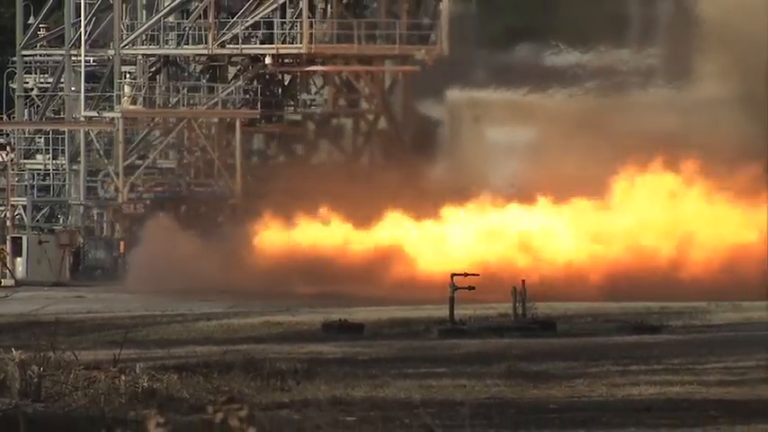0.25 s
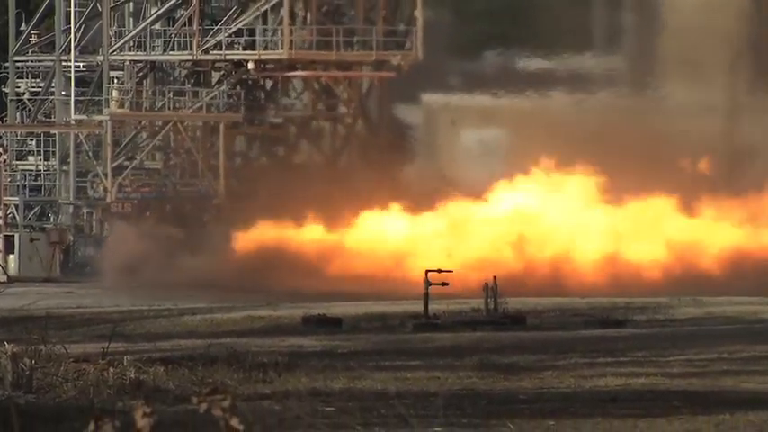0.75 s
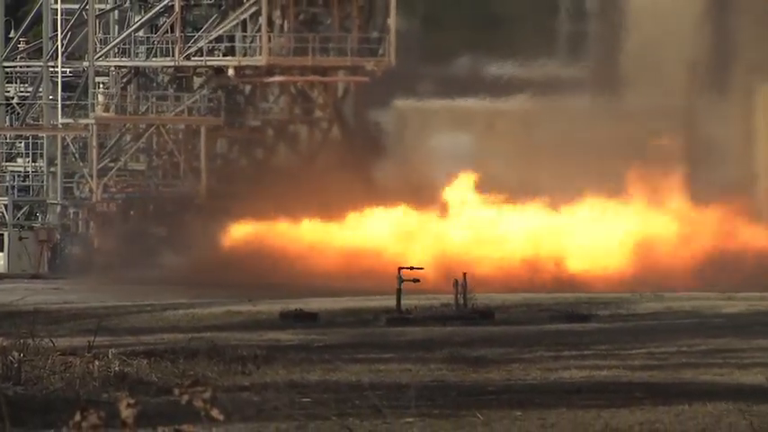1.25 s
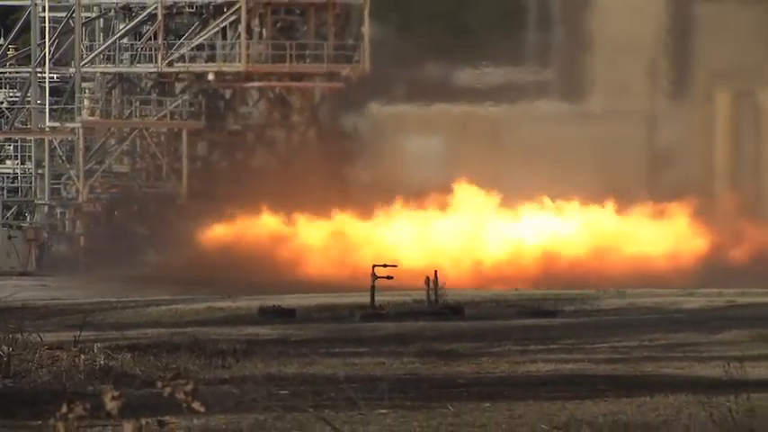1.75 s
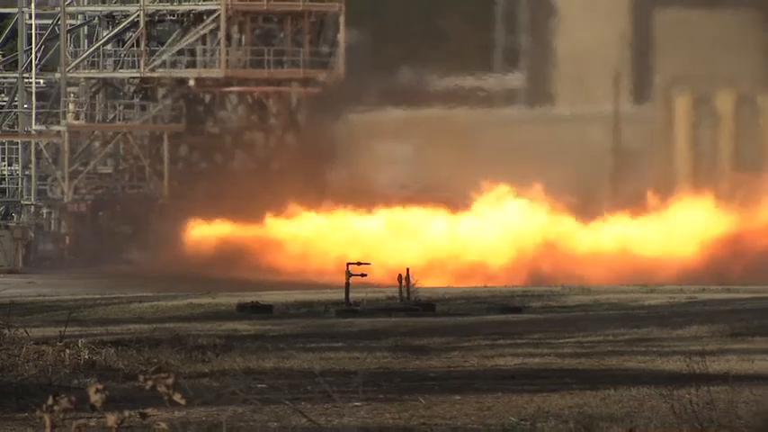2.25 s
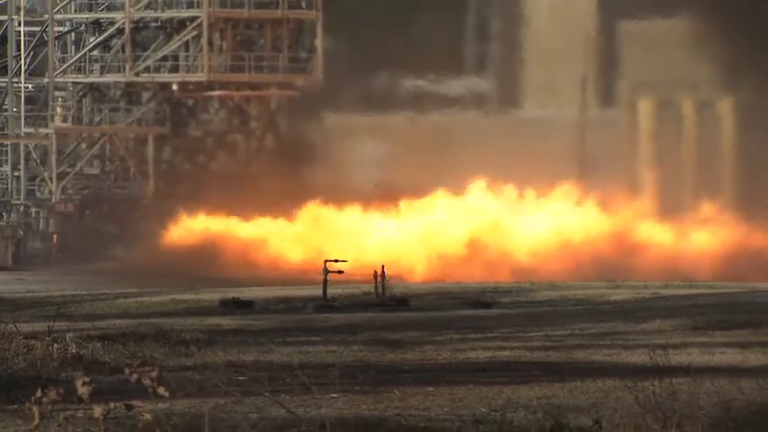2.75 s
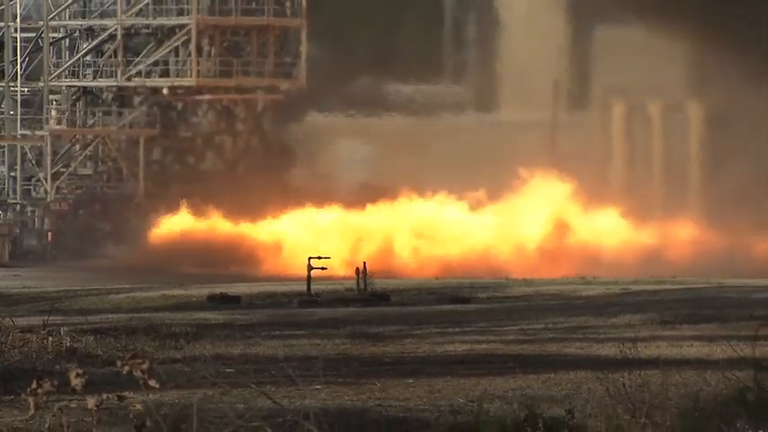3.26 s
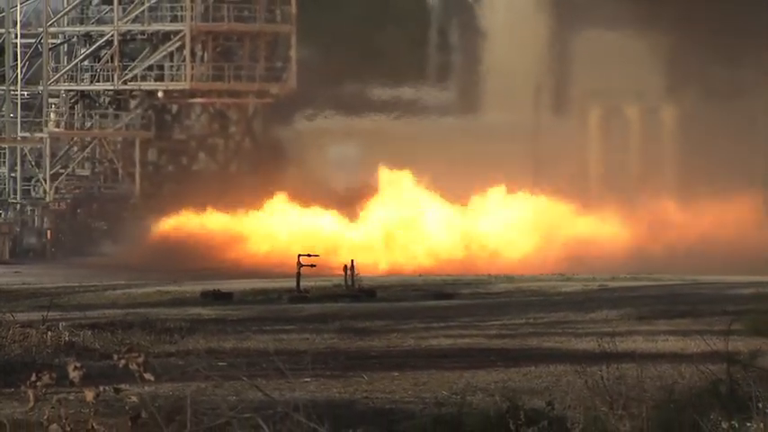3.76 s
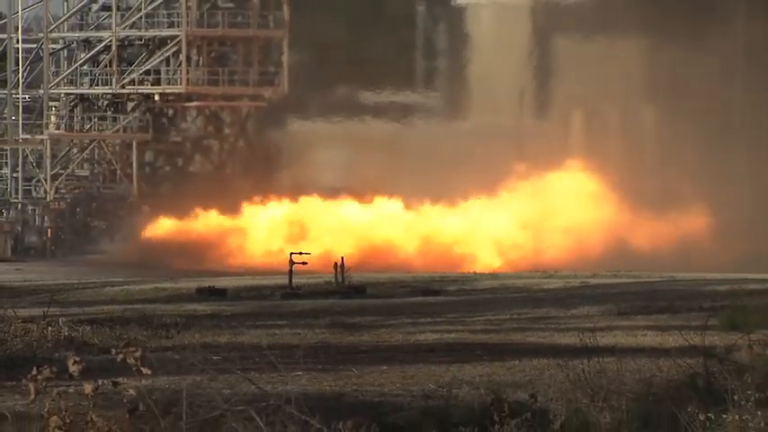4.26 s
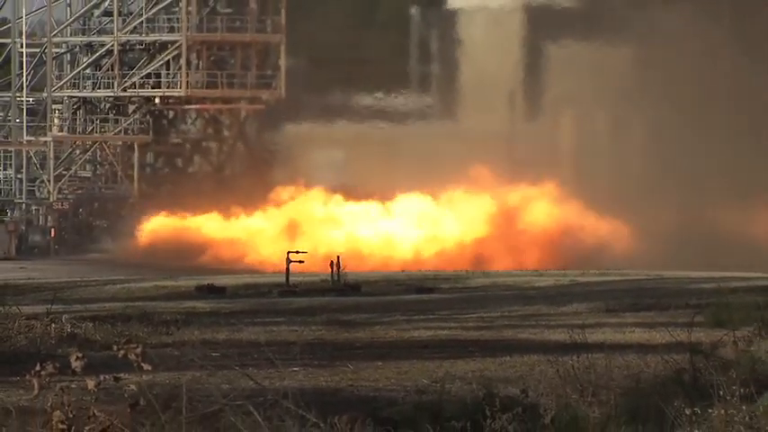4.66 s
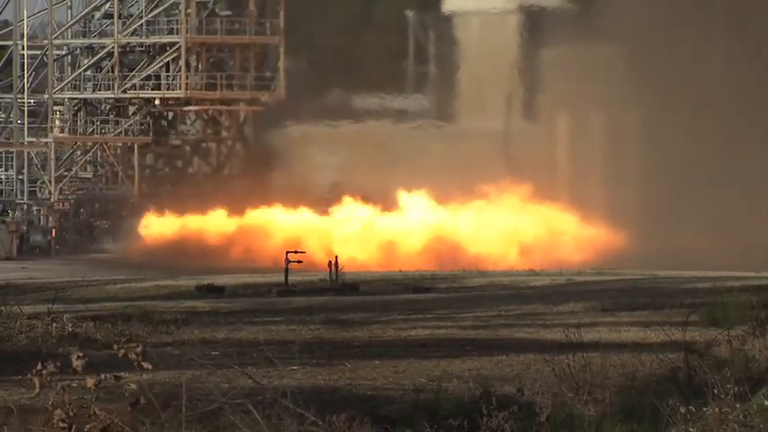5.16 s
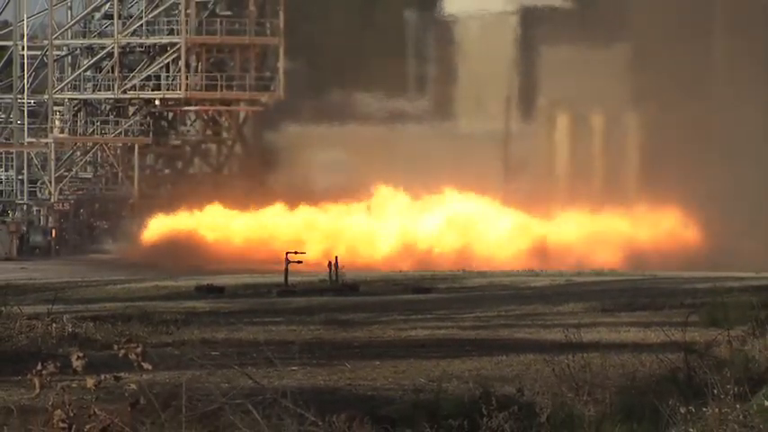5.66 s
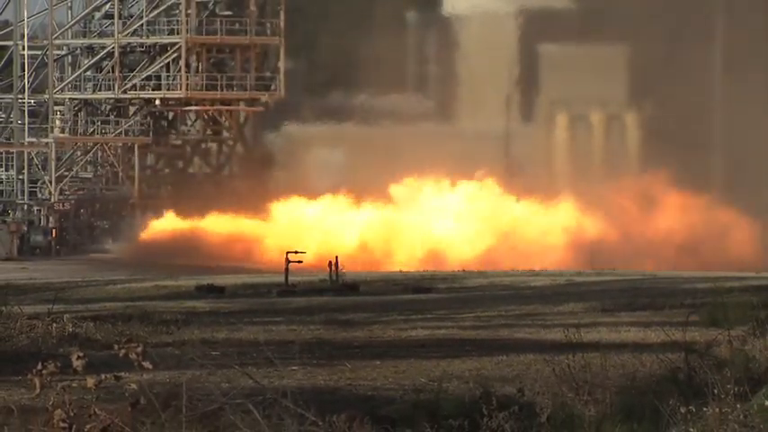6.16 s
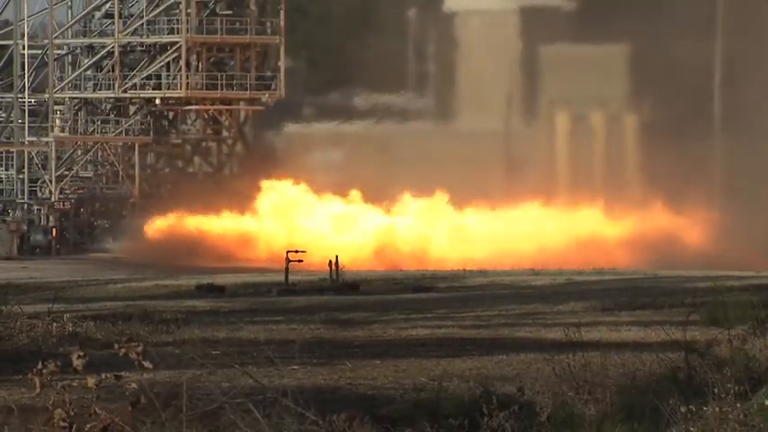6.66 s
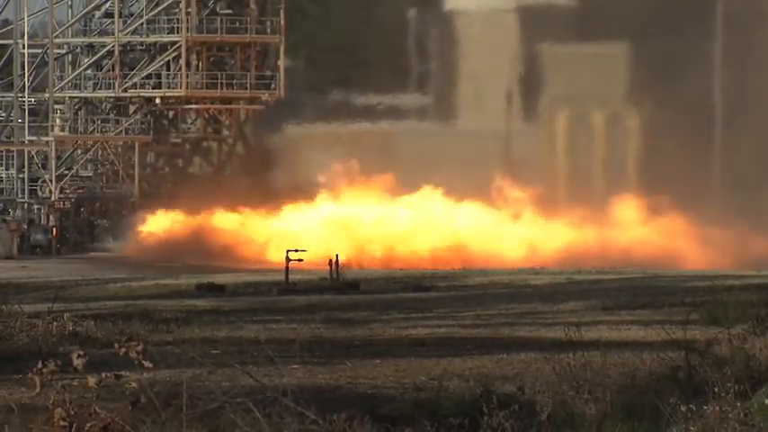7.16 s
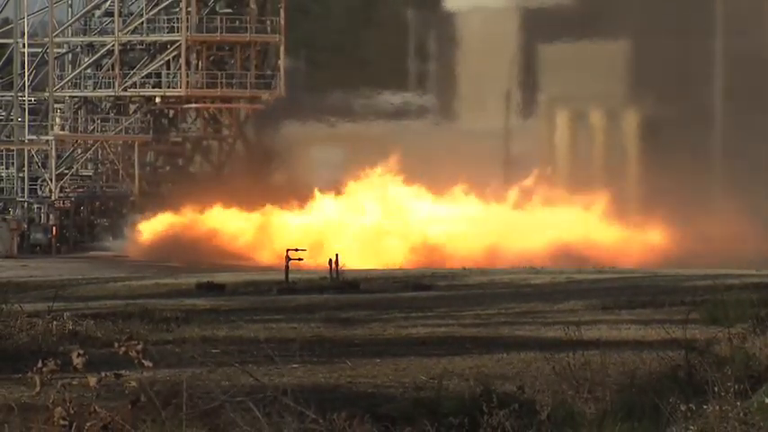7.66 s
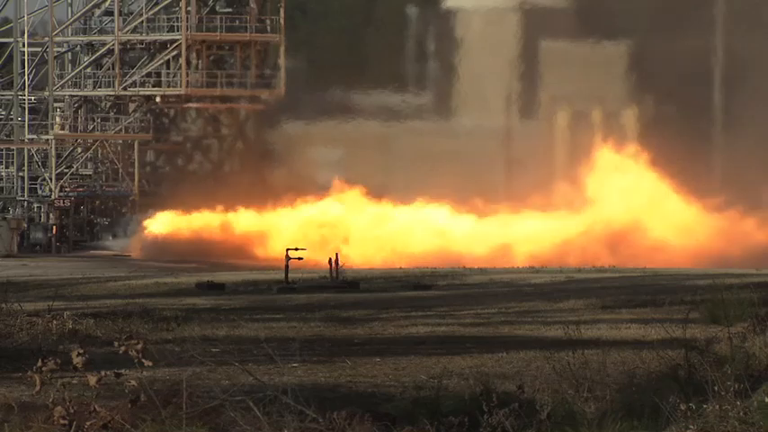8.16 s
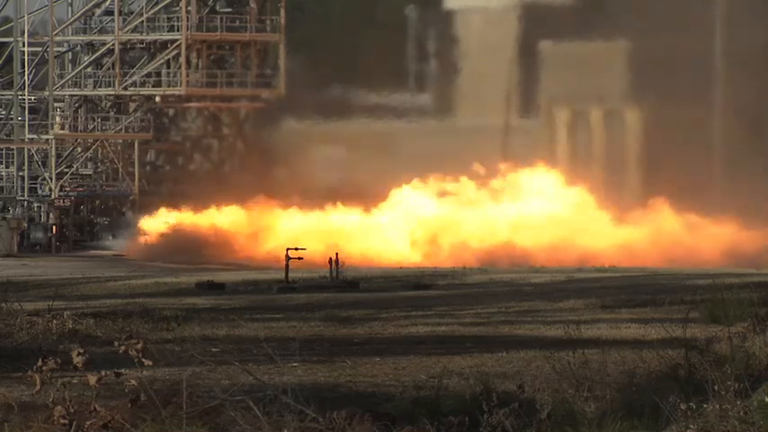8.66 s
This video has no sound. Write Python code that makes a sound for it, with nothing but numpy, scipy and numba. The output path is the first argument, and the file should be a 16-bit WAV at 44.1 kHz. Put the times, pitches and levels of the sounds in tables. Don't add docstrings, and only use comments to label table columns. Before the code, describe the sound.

Continuous rush of a distant rocket engine flame, low rumbling and roaring with a soft, slowly shifting hiss and flat, squeezed loudness.

```python
import sys
import numpy as np
from scipy import signal
from scipy.fft import rfft, irfft, next_fast_len
from scipy.io import wavfile
from scipy.ndimage import uniform_filter1d, map_coordinates
from numba import njit

SR = 44100
rng = np.random.default_rng(int(sys.argv[2]) if len(sys.argv) > 2 else 0)


def waveform_to_disk(signal):
    frames = np.transpose(np.atleast_2d(signal))
    scaled = np.clip(frames, -1, 1) * 32767
    samples = np.round(scaled).astype(np.int16)
    wavfile.write(sys.argv[1], SR, samples)


def gain_from_db(level_db):
    decades = np.asarray(level_db, float) / 20
    return 10 ** decades


N = 393372


def unit(x):
    return x / np.sqrt(np.mean(x ** 2) + 1e-20)


def wobble(rate_hz):
    knots = rng.standard_normal(int(N * rate_hz / SR) + 4)
    return map_coordinates(knots, [np.arange(N) * rate_hz / SR])


def spectrum(points):
    knot_hz, level_db = np.transpose(points)

    def gain(hz):
        return gain_from_db(np.interp(np.log(hz + 1), np.log(knot_hz + 1), level_db, left=-120, right=-120))
    return gain


def rush(gain, patchy_db):
    bins = signal.stft(rng.standard_normal(N + 1024), nperseg=512)[2]
    patches = uniform_filter1d(rng.standard_normal(bins.shape), size=6, axis=0)
    patches = uniform_filter1d(patches, size=8, axis=1)
    noise = signal.istft(bins * gain_from_db(patchy_db * unit(patches)), nperseg=512)[1]
    size = next_fast_len(N + 8192)
    coloured = irfft(rfft(noise, size) * gain(np.fft.rfftfreq(size, 1 / SR)), size)
    return unit(coloured[:N])


# (frequency [Hz], density [dB per Hz])
RUMBLE_SPECTRUM = [(13, -23), (25, -14), (42, -13.5), (70, -5), (90, -3), (112, 0), (135, -2.5),
                   (165, -5.5), (200, -5.5), (260, -8.5), (300, -23), (390, -41.5), (660, -120)]


def rumble():
    return rush(spectrum(RUMBLE_SPECTRUM), patchy_db=-0.8)


# (frequency [Hz], density [dB per Hz])
ROAR_SPECTRUM = [(160, -27), (270, -1.5), (301, -1), (614, -1), (731, -3), (984, -0.5), (1350, -10.5),
                 (1760, -37), (2970, -120)]


def roar():
    return rush(spectrum(ROAR_SPECTRUM), patchy_db=-0.1)


# (frequency [Hz], density [dB per Hz])
HISS_SPECTRUM = [(740, -34.5), (1250, -12.5), (1450, -4.5), (1780, -3.5), (1900, -6), (2260, -15),
                 (2820, -17), (3000, -22.5), (3600, -61.5)]


def hiss():
    return rush(spectrum(HISS_SPECTRUM), patchy_db=0.35)


# (frequency [Hz], density [dB per Hz])
FIZZ_SPECTRUM = [(2400, -30), (2950, -1.5), (3300, -3), (3800, -4.5), (4700, -12), (5350, -17), (6300, -24),
                 (7200, -33), (9000, -42.5), (12000, -70)]


def fizz():
    return rush(spectrum(FIZZ_SPECTRUM), patchy_db=-0.4)


# (centre [Hz], width [Hz], level offset [dB])
HOUSING_RESONANCE = (5660, 630, -15)


def whistle():
    centre_hz, width_hz, offset_db = HOUSING_RESONANCE

    def resonance(hz):
        return 1 / (1 + (2 * (hz - centre_hz) / width_hz) ** 2)
    puffs = gain_from_db(5.1 * wobble(110))
    return gain_from_db(offset_db) * unit(puffs * rush(resonance, patchy_db=0.5))


# (time [s], eddy strength [dB], clearness of the air path [dB])
FIRING = [(0, -1, 4.5), (.4, -0.5, 2.5), (.9, -.5, 1), (1.4, -.5, 0), (1.8, .5, -1), (2.4, -1, -1.5),
          (2.8, -0.5, -1), (3.6, 0, -2), (4.5, 1, -0.5), (5.1, -1, -1), (5.7, 1.5, -.5), (6.6, -0.5, .5),
          (7.4, .5, 1.5), (7.9, -1, 2), (8.4, .5, 1), (8.92, 1, 1.5)]
# (rumble [dB], roar [dB], hiss [dB], fizz [dB])
LAYER_LEVELS = [-26, -26.5, -34, -52]
# (rumble [dB/dB], roar [dB/dB], hiss [dB/dB], fizz [dB/dB])
EDDY_GROWTH = [2, .6, .6, .55]
# (rumble [dB/dB], roar [dB/dB], hiss [dB/dB], fizz [dB/dB])
AIR_OPENING = [.05, .15, .7, 1.1]


def plume():
    knot_s, strength, clearness = np.transpose(FIRING)
    time_s = np.arange(N) / SR
    strength_db = np.interp(time_s, knot_s, strength - strength.mean())
    clear_db = np.interp(time_s, knot_s, clearness - clearness.mean())
    rumble_db, roar_db, hiss_db, fizz_db = [
        level + grows * strength_db + opens * clear_db
        for level, grows, opens in zip(LAYER_LEVELS, EDDY_GROWTH, AIR_OPENING)]
    flutter_db = 0.23 * wobble(14) + 0.5 * wobble(60) + 0.31 * wobble(170)

    mix = gain_from_db(rumble_db) * rumble()
    mix += gain_from_db(roar_db + 0.8 * flutter_db) * roar()
    mix += gain_from_db(hiss_db + 1.0 * flutter_db) * hiss()
    mix += gain_from_db(fizz_db + 1.1 * flutter_db) * fizz()
    whistle_db = -52.5 + 0.3 * clear_db
    return mix + gain_from_db(whistle_db) * whistle()


def scene():
    return plume()[None]


@njit
def peak_follower(x, rise, fall, start):
    out, held = np.empty_like(x), start
    for i in range(len(x)):
        held = held + rise * (x[i] - held) if x[i] > held else held * fall
        out[i] = held
    return out


def gain_control(x, knee_db, squeeze, rise, release_s):
    knee = gain_from_db(knee_db)
    held = peak_follower(x, rise, np.exp(-1 / (release_s * SR)), float(knee))
    return x * (held / knee) ** -squeeze


# (frequency [Hz], density [dB per Hz])
CIRCUIT_SPECTRUM = [(5000, -19.5), (8000, 0), (11000, -9), (14500, -11.5), (15500, -59)]


def circuit_hiss():
    return gain_from_db(-94.5) * rush(spectrum(CIRCUIT_SPECTRUM), patchy_db=0.5)


def band_limit(x):
    return signal.sosfilt(signal.butter(12, 14450, fs=SR, output="sos"), x)


def record(dry):
    ducked = gain_control(dry[0], knee_db=-21, squeeze=0.56, rise=0.66, release_s=0.04)
    bass_cut = signal.butter(2, 70, "highpass", fs=SR, output="sos")
    ducked = signal.sosfilt(bass_cut, ducked)
    mix = (ducked + circuit_hiss())[None]
    return band_limit(mix)


dry = scene()
out = record(dry)
waveform_to_disk(out)
```